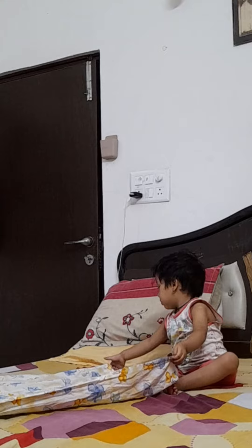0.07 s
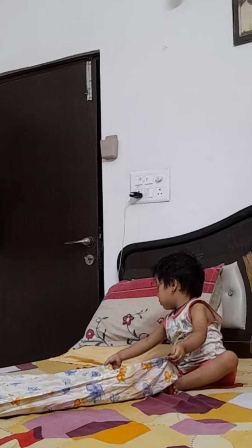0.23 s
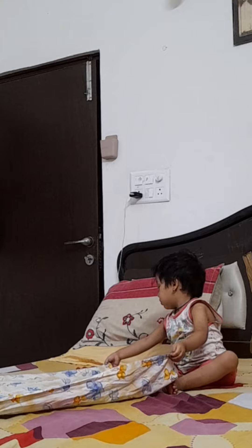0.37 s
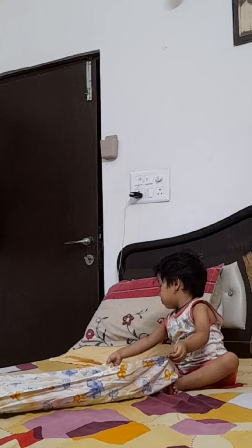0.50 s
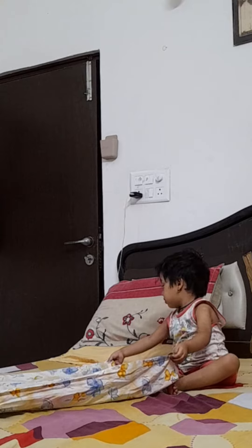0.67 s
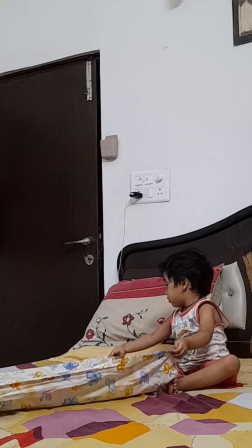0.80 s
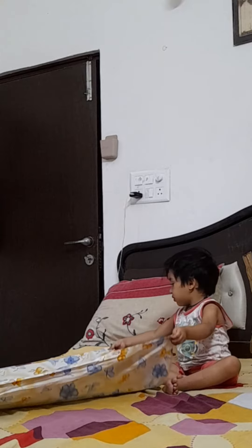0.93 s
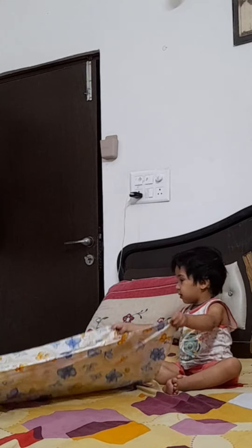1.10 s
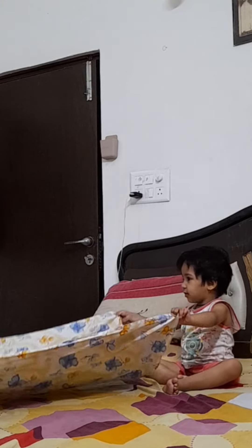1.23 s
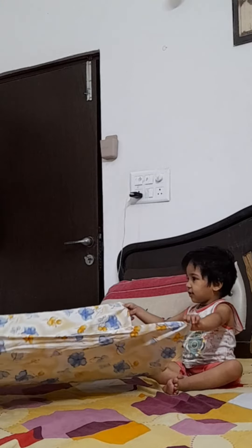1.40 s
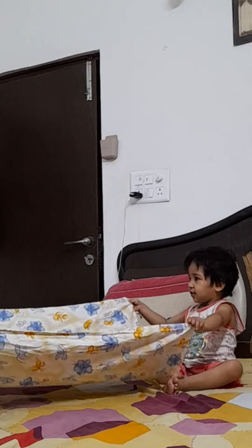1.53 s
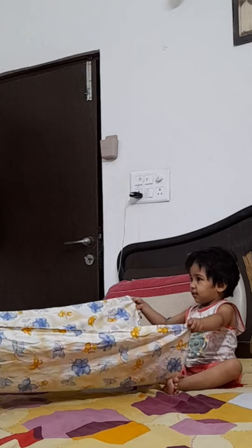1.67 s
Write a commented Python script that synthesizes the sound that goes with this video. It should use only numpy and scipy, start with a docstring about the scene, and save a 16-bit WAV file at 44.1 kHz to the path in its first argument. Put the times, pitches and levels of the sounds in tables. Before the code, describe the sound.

A wooden door shuts once in the next room: a light latch touch, then a low hollow thump with fluttering echoes that die quickly. Quiet low hum and air remain in the bedroom, picked up in stereo.

```python
"""A bedroom: a wooden door shuts in a neighbouring room; latch touch, thump, fluttering echoes, rooms ring out.
Contacts and their echoes excite damped panel modes; the ring-out is banded noise that rises, holds and falls.
Soft bumps and the latch tongue are narrow noise bursts, a faint rustle of cloth is a treble one.
Behind them go on a wavering low sine hum, two rumbling resonances and broad air noise."""
import sys
import numpy as np
from scipy import signal
from scipy.io import wavfile

SR = 44100
rng = np.random.default_rng(int(sys.argv[2]) if len(sys.argv) > 2 else 0)


def waveform_to_disk(signal):
    """Save audio, clipped to [-1, 1], as 16-bit WAV at the path in sys.argv[1]."""
    frames = np.transpose(np.atleast_2d(signal))
    scaled = np.clip(frames, -1, 1) * 32767
    samples = np.round(scaled).astype(np.int16)
    wavfile.write(sys.argv[1], SR, samples)


def amplitude_ratio(level_db):
    """Convert a level in decibels to the matching linear amplitude (field) ratio."""
    exponent = np.asarray(level_db, float) / 20
    return 10 ** exponent


N = 77175

# Stereo balance of the door's sound. Each row: frequency in Hz, left minus right in dB.
DOOR_BALANCE = [(60, -10), (110, -0.5), (200, -1.5), (380, -2), (700, -7.5), (1290, -7.5), (2380, -4),
                (4400, -7), (8120, -13), (15000, -14)]


def rms_one(x):
    """Scale to rms 1."""
    return x / np.sqrt(np.mean(x ** 2) + 1e-20)


def in_time(rows):
    """Interpolate each column after the first (seconds) at every sample."""
    s, *columns = np.transpose(rows)
    return [np.interp(np.arange(N) / SR, s, c) for c in columns]


def time_since(start_s):
    """Seconds since the start, 0 before it."""
    return np.maximum(np.arange(N) / SR - start_s, 0)


def at_hz(points, hz):
    """Interpolate a table on a log-frequency axis."""
    point_hz, values = np.array(points).T
    return np.interp(np.log(hz), np.log(point_hz), values)


def resonance(x, hz, width_hz):
    """Two-pole resonance with zeros at 0 Hz and Nyquist."""
    r = np.exp(-np.pi * width_hz / SR)
    return signal.lfilter([1, 0, -1], [1, -2 * r * np.cos(2 * np.pi * hz / SR), r * r], x)


def band_pass(x, order, edges_hz):
    """Butterworth band-pass."""
    return signal.sosfilt(signal.butter(order, edges_hz, "band", fs=SR, output="sos"), x)


def noise_bands(spectrum, likeness, balance, shape):
    """Third-octave bands of stereo noise, each with its level, likeness, balance and shape in time."""
    edges = 28 * 2 ** (np.arange(29) / 3)
    centres = np.sqrt(edges[1:] * edges[:-1])
    density = amplitude_ratio(at_hz(spectrum, centres)) ** 2
    total = np.sqrt(np.sum(density * np.diff(edges)) / (SR / 2))
    white = rng.standard_normal((2, 2, N + SR // 4))  # neighbouring bands use different noise
    out = 0
    for k, hz in enumerate(centres):
        mid, side = band_pass(white[k % 2], 2, edges[k:k + 2])[:, -N:]
        alike = np.clip(at_hz(likeness, hz), -1, 1)
        pan_db = at_hz(balance, hz) / 2
        pair = np.sqrt(.5 + alike / 2) * mid + np.sqrt(.5 - alike / 2) * side * [[1], [-1]]
        gain = amplitude_ratio(at_hz(spectrum, hz) + np.array([[pan_db], [-pan_db]]))
        out = out + gain * shape(hz) * pair
    return out / total


def panel():
    """Each blow drives every mode with its own strength and gives the low modes its own share; modes build up."""
    # Door contacts and their echoes.
    # Each row: start in seconds, relative level in dB, share that reaches the low modes.
    blows = [(0.2186, -33, 0.15), (0.2338, -38.5, 0.33), (0.2474, -25.5, 0.71), (0.2695, -26, 0.35),
             (0.293, -24.5, 0.5), (0.312, -29.5, 0.58), (0.35, -32.5, 0.05), (0.374, -39, 0.4)]
    # Panel modes. Each row: frequency in Hz, relative level in dB, decay t60 in s, build-up t60 in s.
    modes = [(64.7, -25, .3, 0.038), (90.7, -14.5, 0.56, 0.024), (111, -2.5, 0.18, 0.016),
             (134.1, 4.5, 0.21, 0.0073), (160, -16, 0.52, .04), (201.3, -5.5, 0.33, 0.02),
             (234.2, -7.5, 0.27, 0.037), (248.1, -8, 0.1, 0.017), (283, -20.5, 0.28, 0.063),
             (310.3, -10, 0.31, 0.02), (347.4, -4.5, 0.15, 0.063), (402.6, -11.5, 0.1, 0.025),
             (461, -16, 0.092, 0.027), (498.4, -11.5, 0.117, 0.026), (536.4, -17.5, 0.14, 0.017),
             (773.6, -10, 0.11, 0.0068), (870, -29, 0.12, 0.0085), (939, -17, 0.11, 0.015),
             (1079, -16, 0.14, 0.0067), (1157.7, -16, .2, 0.012)]
    panel_db, low_modes_below_hz = 3, 215
    pan_share = 0.81  # of the door balance
    s, db, weight = np.transpose(blows)
    spread_db = rng.normal(0, 1.44, (len(s), len(modes)))
    out = np.zeros((2, N))
    for k, (hz, mode_db, t60_s, build_s) in enumerate(modes):
        reach = np.clip(weight, 0, 1) if hz < low_modes_below_hz else 1
        drive = np.full(N, 1e-18 + 0j)
        drive[(s * SR).astype(int)] = reach * amplitude_ratio(db + mode_db + spread_db[:, k])
        turn = np.exp(2j * np.pi * hz / SR)
        slow = amplitude_ratio(-60 / (t60_s * SR)) * turn
        fast = amplitude_ratio(-60 / (build_s * SR)) * turn
        ringing = signal.lfilter([1 - abs(fast)], np.poly([slow, fast]), drive).imag
        pan_db = pan_share * at_hz(DOOR_BALANCE, hz) / 2
        out += amplitude_ratio([[pan_db], [-pan_db]]) * ringing
    return amplitude_ratio(panel_db) * out


def ring_out():
    """Reflections pile up in two steps, later in the bass, hold a while, then die."""
    # Spectrum. Each row: frequency in Hz, relative density in dB per Hz.
    spectrum = [(150, -39), (250, -11), (325, -9.5), (421, -16.5), (484, -14), (629, -26), (761, -15.5),
                (922, -19.5), (1200, -20), (1500, -36), (2050, -24.5), (2570, -33), (3230, -33),
                (6940, -41), (8700, -52), (13000, -44), (14900, -49), (16000, -58)]
    # Each row: frequency in Hz, left-right likeness (clipped to -1..1).
    likeness = [(60, 0.84), (130, 0.73), (290, 0.98), (640, 1), (1410, -0.029), (3100, 0.14), (6820, 0.5),
                (15000, -1)]
    # Each row: frequency in Hz, start in seconds.
    start = [(60, .245), (200, .24), (400, .225), (1000, .2185), (16000, .2185)]
    # Each row: frequency in Hz, rise time constant in s.
    rise_time = [(400, 0.011), (2000, 0.002), (16000, 0.00067)]
    # Each row: frequency in Hz, hold before the fall sets in, in s.
    hold_time = [(300, 0.091), (1000, 0.075), (4000, 0.068), (9000, 0.01), (13000, 0.013)]
    # Each row: frequency in Hz, final fall in dB per s.
    fall_rate = [(300, 203), (1000, 191), (4000, 172), (7000, 162), (9000, 212), (13000, 152), (16000, 192)]
    ring_db = -31
    # the latch gives a share at once, the rest follows with the second contact
    latch_share, second_contact_delay_s = 0.88, 0.015

    def shape(hz):
        t = time_since(at_hz(start, hz))
        rise_s, hold_s = at_hz(rise_time, hz), at_hz(hold_time, hz)
        latch = 1 - np.exp(-t / rise_s)
        second_contact = 1 - np.exp(-np.maximum(t - second_contact_delay_s, 0) / rise_s)
        fall_db = at_hz(fall_rate, hz) * (np.sqrt(t * t + hold_s * hold_s) - hold_s)
        return (latch_share * latch + second_contact) * amplitude_ratio(-fall_db)

    return amplitude_ratio(ring_db) * noise_bands(spectrum, likeness, DOOR_BALANCE, shape)


def bumps():
    """A soft bump, the latch tongue, another bump: band-passed noise that rises fast and dies."""
    # Each row: start in seconds, level in dB, centre in Hz, width in Hz, rise time constant in s, t60 in s.
    rows = [(0.102, -47.5, 268.4, 69, 0.013, 0.63), (0.219, -25, 425, 50, 0.0055, 0.18),
            (1.092, -53.5, 408.7, 160, 0.0045, 0.62)]
    out = 0
    for s, db, hz, width_hz, rise_s, t60_s in rows:
        t = time_since(s)
        mid, side = rng.standard_normal((2, N))
        noise = mid + min(hz / 1500, 1) * side * [[1], [-1]]  # wider stereo at higher pitch
        burst = rms_one(band_pass(noise, 3, [hz - width_hz / 2, hz + width_hz / 2]))
        out = out + (1 - np.exp(-t / rise_s)) * amplitude_ratio(db - 60 * t / t60_s) * burst
    return out


def rustle():
    """A faint swish of cloth: treble noise that rises fast and dies."""
    # Lower and upper band edge in Hz.
    band_hz = [3000, 7400]
    start_s, level_db, rise_s, t60_s = 0.83, -70.5, 0.015, 0.62
    t = time_since(start_s)
    noise = rms_one(band_pass(rng.standard_normal((2, N)), 4, band_hz))
    return (1 - np.exp(-t / rise_s)) * amplitude_ratio(level_db - 60 * t / t60_s) * noise


def hum():
    """A wavering low sine and two room resonances excited by noise, slightly to the right."""
    # Sine level. Each row: time in seconds, rms level in dB.
    tone_level = [(0.0, -58), (0.086, -54), (0.154, -53), (0.184, -72), (0.228, -77), (0.408, -46.5),
                  (0.862, -47.5), (0.926, -52), (0.998, -46), (1.042, -57.5), (1.126, -45), (1.184, -91),
                  (1.364, -52), (1.418, -84), (1.48, -43), (1.594, -73), (1.636, -56), (1.75, -90)]
    # Resonance levels. Each row: time in seconds, level of the first in dB, of the second in dB.
    rumble_level = [(0.45, -89, -63), (0.51, -46, -67), (0.638, -64.5, -60.5), (0.8, -54.5, -59.5),
                    (0.952, -87, -114), (0.992, -58.5, -103), (1.05, -54, -61), (1.166, -57, -106),
                    (1.3, -89, -63.5), (1.426, -58, -59.5), (1.626, -61, -67.5), (1.662, -63.5, -93),
                    (1.72, -57.5, -70), (1.75, -58, -101)]
    # Each row: resonance frequency in Hz, width in Hz.
    rumble_bands = [(87, 4), (160, 29)]
    tone_hz = 53.5
    tone = np.sin(2 * np.pi * (tone_hz * np.arange(N) / SR + rng.random()))
    out = np.sqrt(2) * amplitude_ratio(in_time(tone_level)[0]) * tone
    for (hz, width_hz), db in zip(rumble_bands, in_time(rumble_level)):
        out = out + amplitude_ratio(db) * rms_one(resonance(rng.standard_normal(N), hz, width_hz))
    return out * amplitude_ratio([[-.8], [.8]])


def air():
    """Broad room noise whose lower part swells slowly; the hiss above stays even."""
    # Spectrum. Each row: frequency in Hz, relative density in dB per Hz.
    spectrum = [(25, -32), (43, -3.5), (87, -4.5), (108, -5), (160, -5), (190, -12.5), (242, -11.5),
                (280, -12.5), (320, -8), (405, -10.5), (545, -21), (700, -21.5), (1190, -19.5), (1520, -38),
                (2110, -30.5), (2700, -44.5), (4000, -42), (5500, -53.5), (7000, -39), (8500, -45),
                (10200, -38.5), (13000, -40.5), (16000, -41)]
    # Each row: frequency in Hz, left-right likeness (clipped to -1..1).
    likeness = [(60, 0.87), (130, 0.82), (290, 1), (640, 1), (1410, -0.86), (3100, -0.68), (6820, -2.67),
                (15000, 1)]
    # Each row: frequency in Hz, left minus right in dB.
    balance = [(60, -3.5), (110, -1), (200, 0), (380, -2.5), (700, -12.5), (1290, -12.5), (2380, -20),
               (4400, -18.5), (8120, -0.5), (15000, -3.5)]
    # Each row: time in seconds, level in dB before the offset.
    level = [(0.0, -73.5), (0.214, -68), (0.37, -68), (1.432, -71.5), (1.608, -73), (1.75, -76)]
    offset_db, swell_below_hz = 12, 6000
    level_db, = in_time(level)

    def shape(hz):
        return amplitude_ratio(offset_db + (level_db if hz < swell_below_hz else level_db[-1]))

    return noise_bands(spectrum, likeness, balance, shape)


def scene():
    """Door panel, ring-out, bumps, rustle, hum and air."""
    return panel() + ring_out() + bumps() + rustle() + hum() + air()


def band_limit(x):
    """A steep low-pass at the top of the band."""
    return signal.sosfilt(signal.butter(12, 16420, fs=SR, output="sos"), x)


def record(dry):
    """The right port hears later; the deepest bass and the top are cut."""
    low_cut_hz, top_cut_hz, right_lag_s = 56.5, 15800, .0003
    pair = np.array([dry[0], np.roll(dry[1], round(right_lag_s * SR))])
    pair = signal.sosfilt(signal.butter(4, low_cut_hz, "high", fs=SR, output="sos"), pair)
    pair = signal.sosfilt(signal.ellip(10, .5, 40, top_cut_hz, fs=SR, output="sos"), pair)
    return band_limit(pair)


dry = scene()
out = record(dry)
waveform_to_disk(out)
```